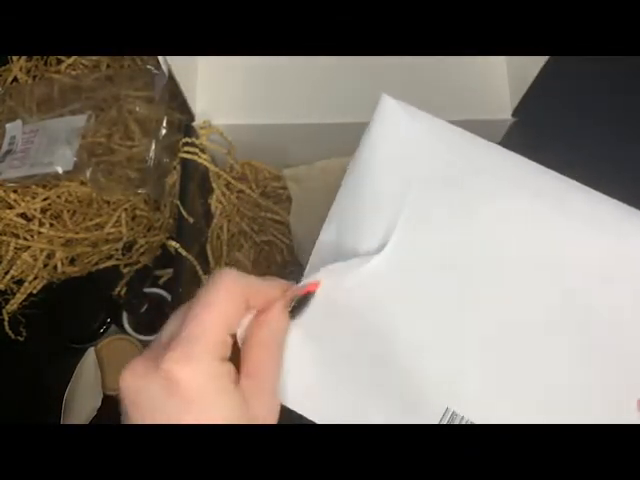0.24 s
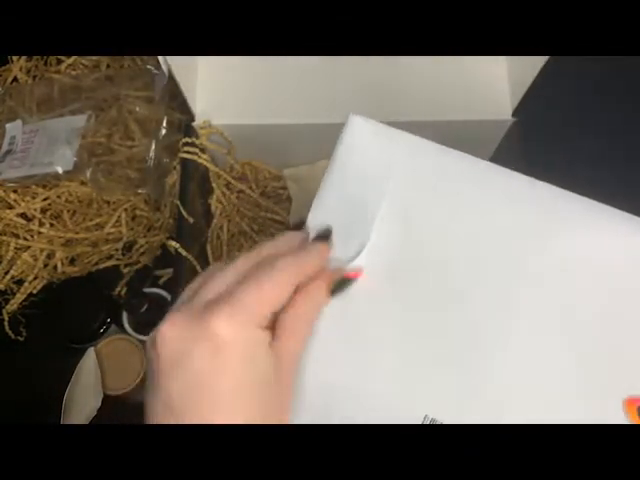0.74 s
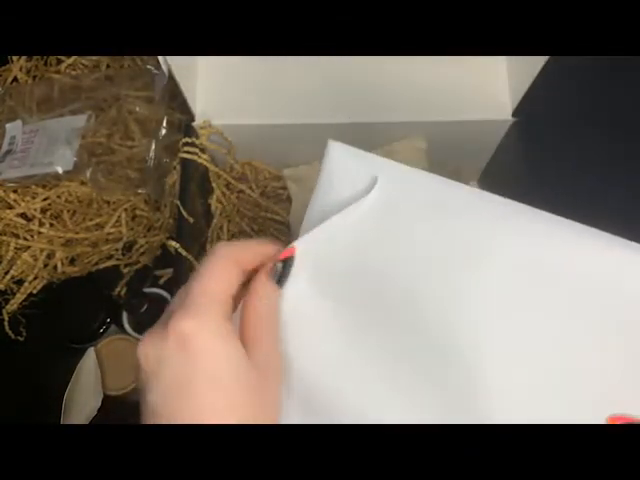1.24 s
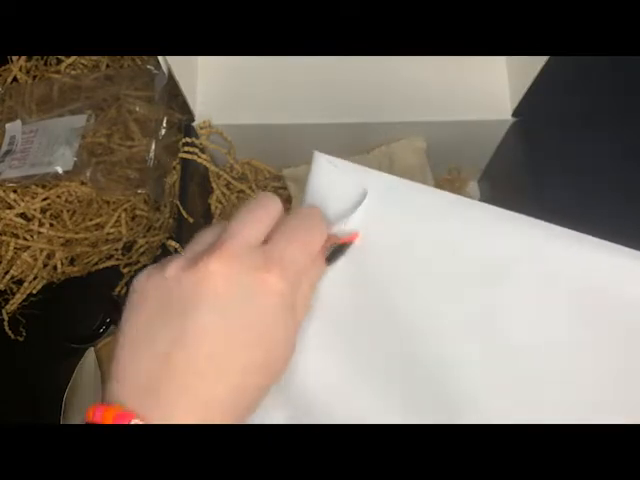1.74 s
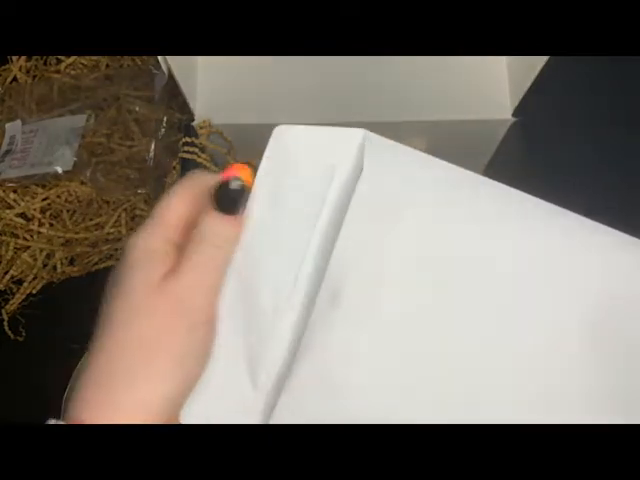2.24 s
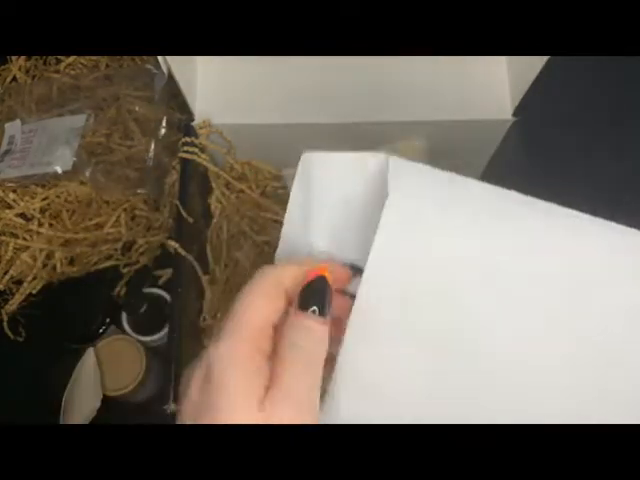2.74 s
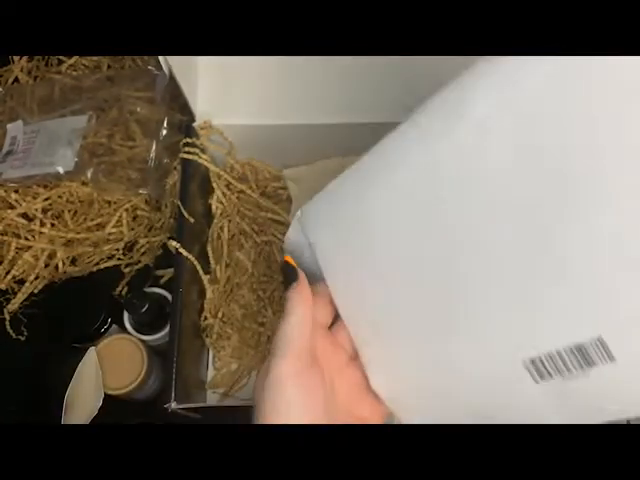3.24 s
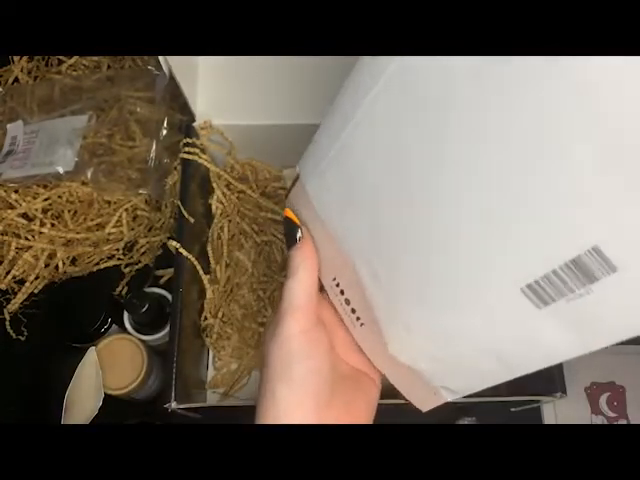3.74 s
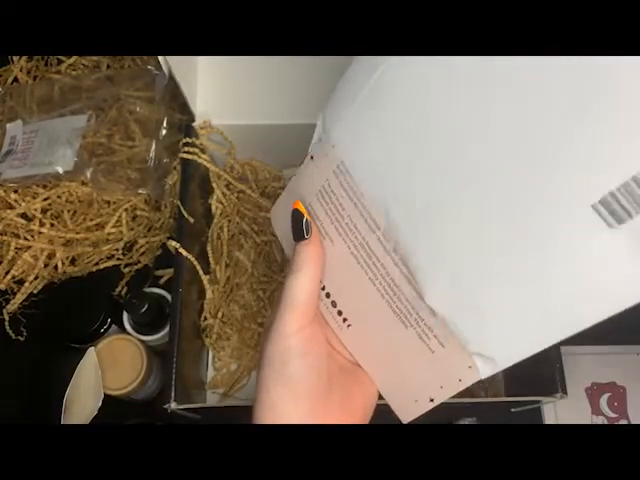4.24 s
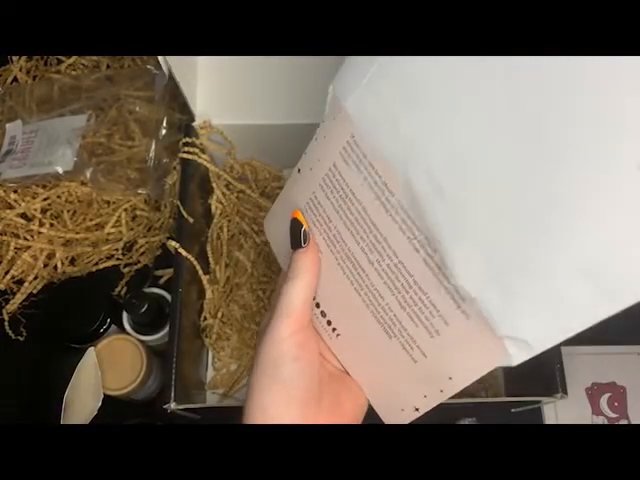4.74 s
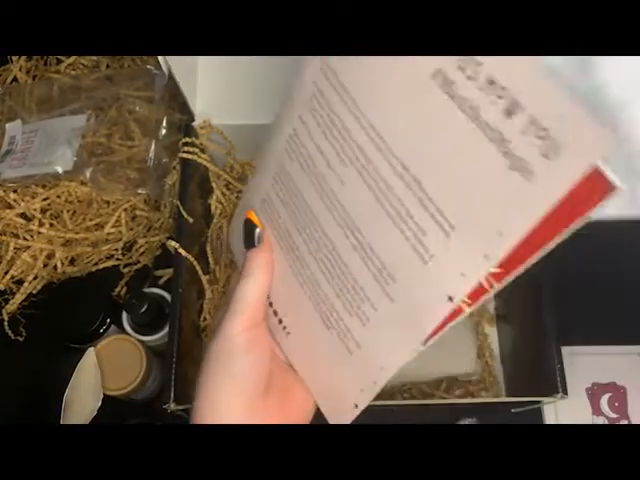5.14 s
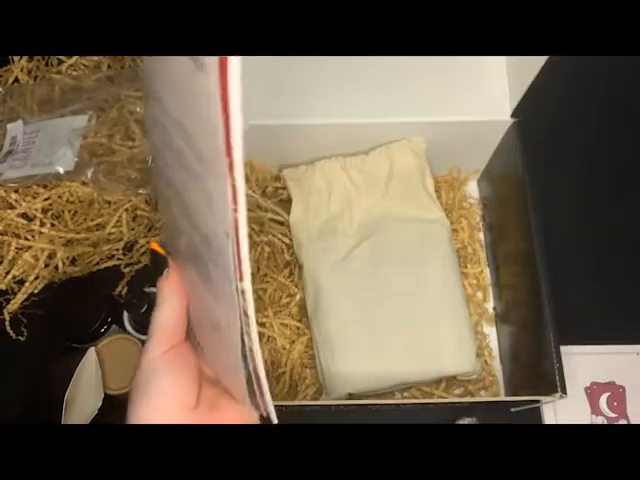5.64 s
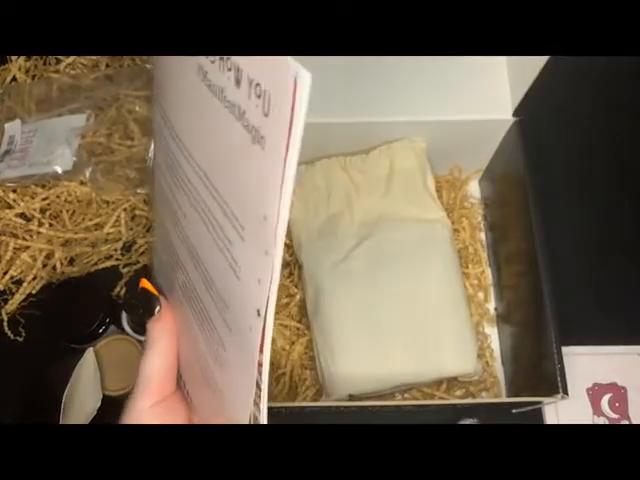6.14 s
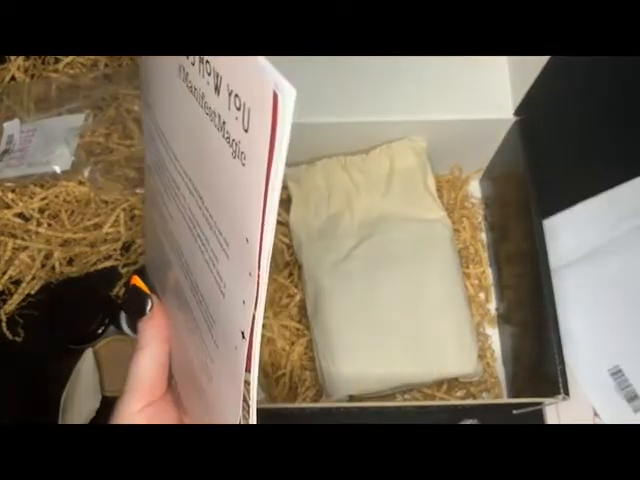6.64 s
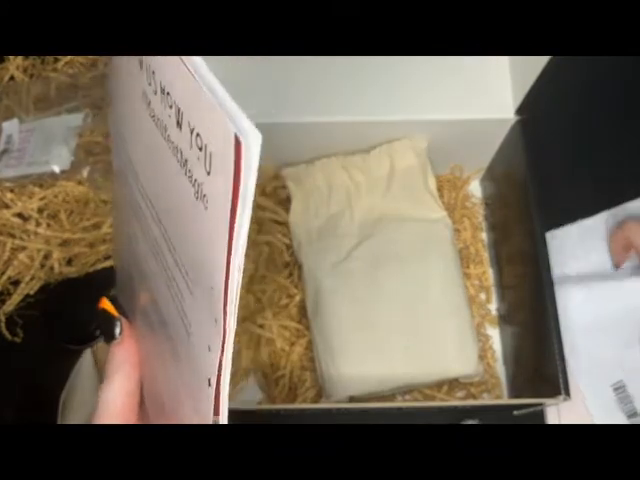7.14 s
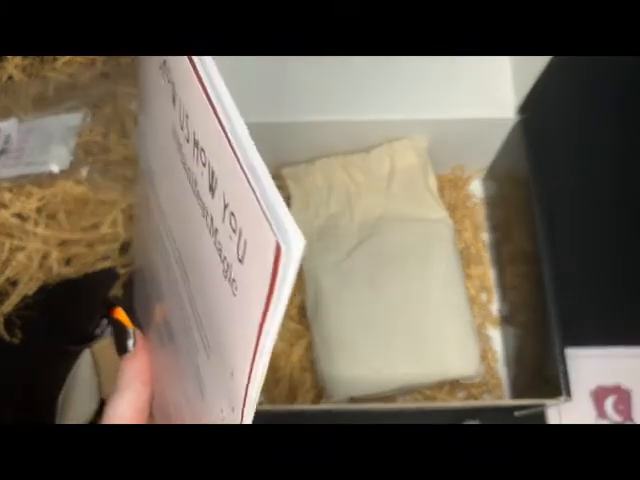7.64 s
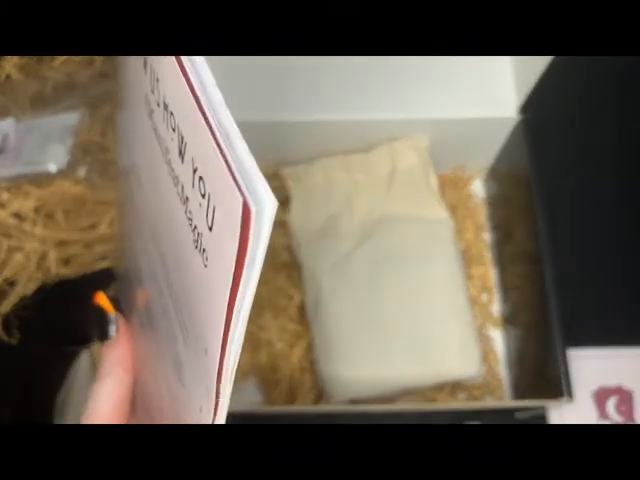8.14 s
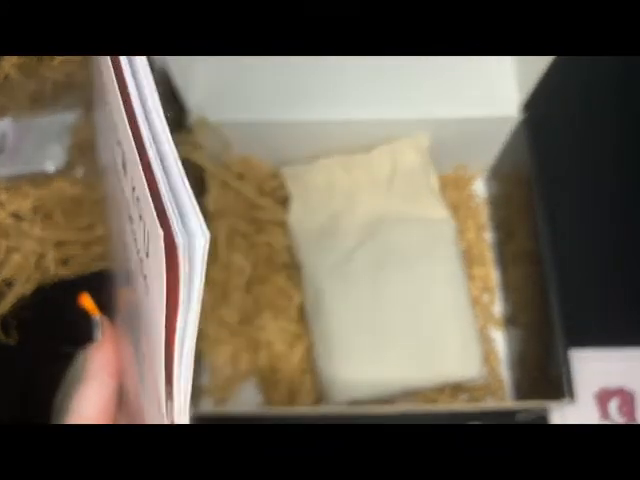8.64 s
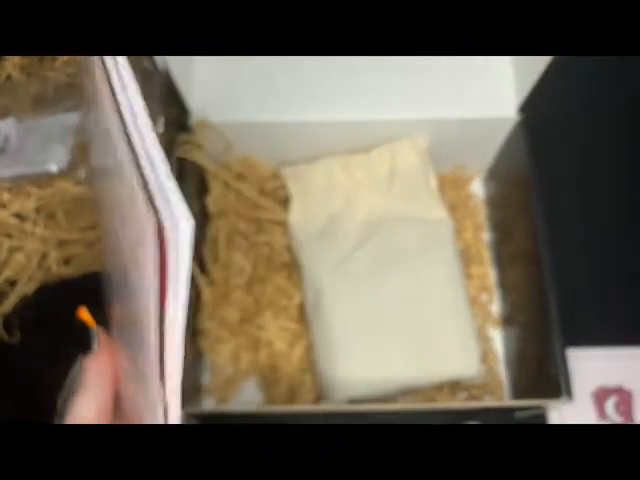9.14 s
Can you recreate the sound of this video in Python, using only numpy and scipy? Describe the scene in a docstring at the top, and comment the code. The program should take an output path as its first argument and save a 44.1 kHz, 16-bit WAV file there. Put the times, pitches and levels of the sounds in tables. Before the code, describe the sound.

Very close to a phone in a small, quiet room, fingers work at a large paper envelope. Rubbing and ticking creases start at once, with a rapid volley of snaps, then more rustling strokes. Just before two seconds a short loud rip ends abruptly with a hard crack. Softer rustles and sliding sheets follow, then sparse handling with two sharp pops over a faint low rumble.

```python
"""Paper rubs in strokes from the start while small creases tick; a volley of snaps follows, then a short rip:
fingers peel open the glued flap of a large envelope, slide sheets out and lay it down, close to a phone in a small room.
Rubbing is shaped noise, snaps are cracks ringing in paper panels and the whole sheet, the rip is swelling noise.
A low rumble and faint room tone lie beneath; the phone sends one microphone's treble to both channels, turned in phase."""
import sys
import numpy as np
from scipy import signal
from scipy.fft import rfft, irfft, next_fast_len
from scipy.io import wavfile
from scipy.ndimage import uniform_filter1d, map_coordinates

SR = 44100
rng = np.random.default_rng(int(sys.argv[2]) if len(sys.argv) > 2 else 0)


def master_out(mix):
    """Clip the mix to full scale and print it as 16-bit PCM to the path in sys.argv[1]."""
    frames = np.transpose(np.atleast_2d(mix))
    ceiling = np.clip(frames, -1, 1)
    pcm = np.round(ceiling * 32767).astype(np.int16)
    wavfile.write(sys.argv[1], SR, pcm)


N = 413658

# Where the paper is. Each row: time in seconds, lag of the left channel in ms, crackle re rasp in dB,
# top treble gain in dB, room tail re snap in dB, small panels re large in dB.
PLACE = [(0, -0.089, -5, -2, -17, 12), (.6, -0.083, -8, 2.5, -23.5, 2.5), (2.3, -.11, -4, 2.5, -17.5, 1.5),
         (2.8, -0.089, -6.5, -3, -22, 4.5), (5.2, 0, -19.5, -1.5, -13.5, 9), (5.8, 0.2, -6.5, -4.5, -11, 3),
         (7.4, 0.17, -8, -5, -13.5, 5), (8.3, .2, -6, 3, -11, 5), (9.38, 0.22, -6, 0, -14, 8)]
# Spectrum of rubbing and breaking fibres. Each row: frequency in Hz, relative density in dB per Hz.
FIBRES = [(3500, -31), (5500, -5), (7000, -1.5), (9000, 1), (11500, -4.5), (14000, -2), (16500, -7.5)]
# Spectrum of small paper panels. Each row: frequency in Hz, relative density in dB per Hz.
SMALL_PANELS = [(1400, -23), (1800, -9), (2200, -0.5), (2900, -6), (4000, -7), (5500, -11), (8000, -23.5)]


def amp(db):
    """Gain of a level in dB."""
    return 10 ** (np.asarray(db) / 20)


def unit(x):
    """Scaled to rms 1."""
    return x / np.sqrt(np.mean(x ** 2) + 1e-20)


def curves(rows):
    """One value per sample for each column after the time."""
    time_s, *columns = np.transpose(rows)
    return [np.interp(np.arange(N) / SR, time_s, c) for c in columns]


def wobble(rate_hz):
    """A smooth random curve, rate_hz knots a second."""
    knots = rng.standard_normal(int(N * rate_hz / SR) + 4)
    return map_coordinates(knots, [np.arange(N) * rate_hz / SR])


def filtered(x, response):
    """x times a complex response of frequency."""
    size = next_fast_len(N + 8192)
    spectrum = rfft(x, size) * response(np.fft.rfftfreq(size, 1 / SR))
    return irfft(spectrum, size)[..., :N]


def coloured(x, spectrum):
    """x through (Hz, dB) points; white noise keeps its power."""
    f, db = np.transpose(spectrum)

    def gain(hz):
        return unit(amp(np.interp(np.log(hz + 1), np.log(f), db, -120, -120)))

    return filtered(x, gain)


def pair(alike, patchy_db):
    """White stereo noise of channel correlation alike, with patches of random gain in time and pitch."""
    z = signal.stft(rng.standard_normal((2, N)), nperseg=256)[2]
    field = rng.standard_normal(z.shape[1:])
    field = uniform_filter1d(uniform_filter1d(field, 4, 0), 8, 1)
    mid, side = signal.istft(z * amp(patchy_db * unit(field)), nperseg=256)[1][:, :N]
    turn = np.arccos(np.clip(alike, 0, 1)) / 2
    return unit(np.cos(turn) * mid + np.sin(turn) * np.array([side, -side]))


def catches(rate_hz, spread_db, t60_s):
    """Envelope of fibres that catch and let go at random moments, a few much harder than the rest."""
    when, size = rng.random(N), rng.exponential(1, N)
    kicks = (when < rate_hz / SR) * amp(spread_db * np.minimum(size, 3))
    return signal.lfilter([1], [1, -amp(-60 / (t60_s * SR))], kicks)


def strokes():
    """Gain of each rubbing layer: every stroke rises, holds and dies away; overlapping strokes add in power."""
    # Each row: time of full force in seconds, force in dB, rise in seconds, hold in seconds,
    # hiss re rasp in dB, boom re force in dB.
    stroke_rows = [(0.0, -39.5, .02, 0.024, 7, -4), (0.181, -29.5, 0.27, 0.03, -3, -10.5),
                   (0.253, -39, 0.15, 0.2, -6, -30), (0.505, -44, 0.094, 0.0018, -11, 2),
                   (0.655, -38.5, 0.033, .12, -5.5, -20), (0.888, -33.5, 0.31, 0.053, -0.5, -6),
                   (1.028, -28.5, 0.3, 0.037, 0.5, -13), (1.097, -37.5, 0.16, 0.026, 0.5, -6.5),
                   (1.259, -39.5, 0.13, 0.0023, -16.5, -6), (1.298, -40.5, 0.097, 0.018, -11.5, 3),
                   (1.506, -50.5, 0.39, .03, -6.5, -9.5), (1.609, -42.5, 0.022, .03, -0.5, -6.5),
                   (1.707, -37.5, 0.031, 0.041, 2.5, -10.5), (1.776, -54.5, 0.15, .02, 15.5, 7),
                   (1.888, -39, 0.23, 0.0014, -3.5, -6), (1.947, -17, 0.083, .0, -10.5, 4),
                   (2.028, -48, .1, 0.042, -11, 16), (2.21, -47.5, 0.11, 0.083, -2, 3),
                   (2.57, -40, 0.015, 0.01, -2, 0.5), (2.648, -42, 0.057, .0, 1, -3.5),
                   (2.763, -48, 0.17, .0, -3, 5), (2.909, -51, 0.1, 0.11, -3, -9),
                   (3.093, -48, 0.25, 0.039, -5.5, 1), (3.187, -44, 0.047, 0.0061, -7, -2),
                   (3.286, -44, 0.12, 0.18, 5.5, -16), (3.496, -39, 0.12, .0, -12.5, 11),
                   (3.576, -51.5, 0.083, 1.56, 2, -13.5), (3.693, -38.5, 0.038, .0, 1.5, -16),
                   (3.803, -36, 0.15, 0.021, 2, -4.5), (3.96, -42, 0.41, 0.065, -2.5, -0.5),
                   (4.073, -39, 0.025, 0.043, 3, -8), (4.23, -45.5, 0.077, 0.09, 0, -8),
                   (4.461, -36.5, 0.08, 0.02, 6, -17), (4.609, -45.5, 0.12, 0.021, -4, -11),
                   (4.688, -41.5, 0.029, 0.016, 3, -12), (4.774, -40.5, 0.054, 0.096, 9, -12),
                   (4.922, -43, 0.067, 0.2, 7.5, -4), (5.455, -56.5, 0.12, 0.0087, -1.5, -1),
                   (5.74, -59, 0.023, .03, 2, -2.5), (5.912, -36.5, 0.12, 0.012, -2.5, -2.5),
                   (6.003, -52, 0.093, 0.01, -5, 2.5), (6.084, -53, 0.063, 0.019, -3, -5.5),
                   (6.234, -43, 0.14, 0.052, 8, -17.5), (6.401, -43, 0.017, 0.034, -8, 4.5),
                   (6.919, -47.5, 0.094, 0.102, 5, -20), (7.066, -35, 0.065, .0, -1, -6),
                   (7.152, -47, 0.078, 0.17, -2.5, -2.5), (7.28, -44.5, 0.13, 0.048, -12.5, 5.5),
                   (7.335, -36.5, 0.0098, 0.11, 1.5, -10), (7.597, -42.5, 0.03, .0, -16, 6),
                   (8.147, -58, 0.014, 0.0084, 2.5, -2), (8.21, -39.5, 0.023, 0.023, 9.5, 3),
                   (8.293, -36.5, 0.15, 0, -12.5, 5), (8.404, -51, 0.22, 0.23, -11.5, -1),
                   (8.491, -36.5, 0.042, 0.0029, -8.5, 9), (8.753, -49.5, 0.03, .0, -18.5, 8),
                   (8.967, -54, 0.05, 0.064, -9.5, 10), (9.223, -54, 0.15, 0.032, -13, 5.5),
                   (9.327, -52.5, 0.17, 0.022, -7, 2)]
    rise_db, release_db_per_s = 38.5, 330  # climb over one rise time; release rate at 0 dB of boom
    small_per_hiss = 0.5  # hissing strokes favour the small panels, dB per dB
    slower_per_boom = 0.18  # booming strokes die away more slowly, dB of rate per dB of boom
    t = np.arange(0, N / SR + .002, .001)
    s, force_db, rise_s, hold_s, hiss_db, boom_db = np.transpose(stroke_rows)[:, :, None]
    before_db = rise_db * np.clip(s - t, 0, None) / np.maximum(rise_s, .005)
    release = release_db_per_s * amp(-slower_per_boom * boom_db)
    after_db = release * np.clip(t - s - hold_s, 0, None)
    shape_db = -before_db - after_db
    small_db = curves(PLACE)[4][(s * SR).astype(int)] + small_per_hiss * hiss_db
    rasp_db = force_db - hiss_db / 2 - 3.0
    layers_db = [rasp_db - small_db / 2, rasp_db + small_db / 2, force_db + hiss_db / 2, force_db + boom_db]
    gains = [np.linalg.norm(amp(level_db + shape_db), axis=0) for level_db in layers_db]
    return [np.interp(np.arange(N) / SR, t, gain) for gain in gains]


def crackle():
    """Small creases tick at random moments, each in one of the panels."""
    # Resonances of the panels that small creases ring in, in Hz.
    crease_hz = [1003, 1570, 2120, 2800]
    total = 0
    for hz in crease_hz:
        kicks = catches(45, spread_db=3, t60_s=0.0024) * rng.standard_normal(N)
        total = total + unit(signal.lfilter(*signal.iirpeak(hz, 5, SR), kicks))
    return unit(total)


def rubbing():
    """Paper drags on paper: noise under uneven pressure, roughened by catching fibres, in large and small panels."""
    # Spectra of large panels and of the whole sheet. Each row: frequency in Hz, relative density in dB per Hz.
    large_panels = [(500, -28.5), (750, -14.5), (1030, -2.5), (1300, -4), (1600, -2.5), (2000, -13.5),
                    (3000, -30)]
    whole_sheet = [(130, -23.5), (200, -1.5), (300, -7.5), (360, -2.5), (480, -7), (650, -13.5),
                   (900, -11.5), (1200, -35)]
    large, small, hiss, boom = strokes() * amp(0.8 * wobble(60))
    grip = unit(0.5 + 0.08 * catches(200, spread_db=2.5, t60_s=0.015))
    ticks = np.hypot(large, small) * amp(curves(PLACE)[1]) * crackle()
    large = large * amp(0.77 * wobble(55)) * coloured(grip * pair(0.34, patchy_db=4.5), large_panels)
    small = small * amp(1.7 * wobble(50)) * coloured(grip * pair(0.44, patchy_db=2.5), SMALL_PANELS)
    hiss = hiss * coloured(grip * pair(0.46, patchy_db=4.0), FIBRES)
    buckles = unit(1.5 + .6 * catches(23, spread_db=5.0, t60_s=0.63))  # the sheet buckles at random
    boom = boom * amp(1.7 * wobble(25)) * coloured(buckles * pair(0.87, patchy_db=5.0), whole_sheet)
    return large + small + hiss + boom + ticks


def room():
    """Slightly uneven low rumble, nearly the same on both sides, and a faint room tone."""
    # Rumble level, with air pushed by the moving sheets. Each row: time in seconds, level in dB.
    sway = [(0.0, -49.5), (0.9, -50), (1.2, -57), (2.2, -41.5), (2.4, -51.5), (3.15, -45.5), (5.0, -43.5),
            (6.3, -55), (6.75, -57), (7.6, -43.5), (7.94, -60), (8.3, -47.5), (9.38, -49.5)]
    # Spectra of rumble and room tone. Each row: frequency in Hz, relative density in dB per Hz.
    rumble_spectrum = [(25, -47.5), (38, -2.5), (52, 6), (80, -4.5), (124, -2), (170, -7.5), (260, -19),
                       (400, -42.5)]
    air_spectrum = [(150, -42.5), (250, -2.5), (500, -8.5), (1000, -15), (3000, -19), (6000, -23.5),
                    (16500, -24.5)]
    uneven_db = 2.2 * wobble(8) + 3 * wobble(25)
    rumble = amp(curves(sway)[0] + uneven_db) * coloured(pair(.88, patchy_db=1.83), rumble_spectrum)
    air = amp(-66.0 + 0.48 * wobble(2)) * coloured(pair(0.052, patchy_db=2.0), air_spectrum)
    return rumble + air


def sheet_ring(t, modes):
    """The envelope rings as a slack drum: decaying modes, slightly different at each blow."""
    ring = 0
    for hz, level_db, t60_s in modes:
        decay = amp(level_db + rng.normal(0, 1.5) - 60 * t / t60_s)
        ring = ring + decay * np.sin(2 * np.pi * hz * (1 + rng.normal(0, 0.01)) * t)
    return ring


def snaps():
    """Glue or a crease cracks in a panel of its own pitch, rings the whole sheet and leaves a tail in the room."""
    # Each row: start in seconds, relative level in dB, pitch in Hz, treble re level in dB, boom re level in dB.
    snap_rows = [(0.098, -14.5, 1200, -35, -19), (0.202, -11.5, 1030, -23.5, -20),
                 (0.23, -9.5, 1970, -26, -49), (0.241, -20, 2100, -36, -40), (0.257, -14.5, 2238, -30, -25),
                 (0.267, -13.5, 2170, -27, -49), (0.286, -10.5, 2100, -25, -30),
                 (0.316, -13.5, 2110, -15, -29), (0.342, -9, 2210, -17.5, -29),
                 (0.358, -12, 2170, -14, -44), (0.37, -12, 2180, -17.5, -27), (0.396, -9, 1140, -16.5, -33),
                 (0.43, -10.5, 1130, -19.5, -29), (0.615, -18.5, 2570, -53, -20),
                 (0.651, -17.5, 2330, -16, -41), (0.662, -14, 2000, -26, -17), (0.762, -14, 2170, -27, -27),
                 (0.809, -23, 1050, -15, -9), (0.875, -19, 2200, -19, -34), (0.965, -16, 1660, -20.5, -18),
                 (1.066, -23, 1710, -14.5, 2.5), (1.186, -26, 1030, -22.5, -15),
                 (1.258, -20.5, 1100, -22.5, -24), (1.289, -27, 1030, -8, -2),
                 (1.486, -29.5, 2470, -4.5, -28), (1.781, -27.5, 1000, -9.5, 3.5),
                 (1.877, -13, 1390, -26.5, -5), (1.897, -5, 3150, -18, -24), (1.955, 5.5, 1120, -15.5, 4.5),
                 (1.963, -2.5, 1010, -14, -30), (1.977, -12, 1040, -17.5, -14),
                 (2.008, -11.5, 985, -32.5, 5), (2.244, -14, 1040, -17.5, -1.5),
                 (2.574, -26.5, 2250, -22, -14), (2.587, -25, 960, -14.5, 8), (2.653, -33, 1000, 7, -18),
                 (2.714, -31.5, 970, -17, 7.5), (2.915, -33.5, 1600, -10, -36),
                 (2.952, -25.5, 1440, -21, -9), (3.077, -25.5, 1280, -25.5, -12),
                 (3.083, -21.5, 1330, -32.5, -8), (3.194, -23, 1380, -30, -7.5),
                 (3.487, -12, 1480, -36, -4.5), (3.502, -10, 875, -45, -3),
                 (3.564, -20.5, 2240, -30.5, -28), (3.937, -31, 2230, -13.5, 5),
                 (4.074, -18, 2600, -24, -39), (4.082, -15.5, 2440, -23, -35),
                 (4.293, -30.5, 2400, -10.5, 1), (4.735, -29, 1005, -23, -7), (5.15, -30.5, 1760, 1, -24),
                 (5.299, -50, 820, -23.5, 17.5), (5.789, -40.5, 1440, -27, -10),
                 (5.91, -25, 1120, -10.5, -23), (6.408, -15.5, 1200, -19, -21),
                 (7.06, -23.5, 3730, -8.5, -8.5), (7.22, -15.5, 1804, -20.5, -23),
                 (7.24, -19, 1260, -15, -13), (7.275, -22, 1450, -25.5, -25),
                 (7.326, -10.5, 1180, -29.5, -9), (7.349, 5.5, 1634, -13, -24),
                 (7.355, -3.5, 1500, -16.5, -28), (7.391, -14, 1390, -5.5, -21),
                 (7.475, -25.5, 1180, -4.5, -4), (7.592, -20.5, 1150, -12, -8),
                 (8.198, -31.5, 1650, -12, -14), (8.495, -0.5, 1370, -30, -8.5),
                 (8.749, -20, 1370, -41.5, -24), (8.966, -28, 1510, -27, -12.5),
                 (9.208, -34, 4000, -16.5, -11), (9.291, -24.5, 1440, -21.5, -12.5)]
    # Modes of the whole sheet. Each row: frequency in Hz, relative level in dB, t60 in seconds.
    sheet_modes = [(68, -19.5, 0.19), (125, -9.5, 0.078), (308, -3.5, 0.046), (367.5, -2, 0.1),
                   (443, -5, 0.054), (583, -14.5, 0.068)]
    body, treble, sheet = np.zeros((3, 2, N + SR))
    t = np.arange(SR // 4) / SR
    give = np.exp(-(t / .0026) ** 3)  # a crease gives way within a few ms
    tail_db = curves(PLACE)[3]  # farther paper has more room in it

    def by_onset(x):
        """Scaled to rms 1 over its first 1/300 s."""
        return x / np.sqrt(np.mean(x[..., :SR // 300] ** 2))

    for s, db, hz, treble_db, boom_db in snap_rows:
        start = round(s * SR)
        at = slice(start, start + len(t))
        crack = rng.standard_normal(len(t)) * give
        crack[0] = 4  # sharp kick
        tail = rng.standard_normal((2, len(t))) * amp(tail_db[start]) * (1 - np.exp(-t / 0.00074))
        blow = crack + tail * amp(-60 * t / 0.19)
        panel = signal.lfilter(*signal.iirpeak(hz, 5, SR), blow)
        neighbour_hz = hz * (1.7 if hz < 1800 else .6)
        neighbour = signal.lfilter(*signal.iirpeak(neighbour_hz, 2, SR), blow)
        body[:, at] += amp(db - 10) * (by_onset(panel) + 0.5 * by_onset(neighbour) + 0.18 * by_onset(blow))
        treble[:, at] += amp(db + treble_db + 2.5) * by_onset(crack + .5 * tail * amp(-60 * t / .14))
        sheet[:, at] += amp(db + boom_db - 7.5) * sheet_ring(t, sheet_modes)
    low = filtered(body[:, :N], lambda hz: 1 / (1 + (hz / 5500) ** 4))
    return low + coloured(treble[:, :N], FIBRES) + sheet[:, :N]


def rip():
    """The last of the glue line tears: dense breaking of fibres swells, then stops dead as the flap comes free."""
    # Each row: time in seconds, level in dB.
    tear_level = [(1.896, -69), (1.899, -27), (1.924, -17.5), (1.94, -12.5), (1.956, -11), (1.959, -69.5)]
    s, db = np.transpose(tear_level)
    level = amp(np.interp(np.arange(N) / SR, s, db, -120, -120) + 1.4 * wobble(300))
    fibres = coloured(pair(0.36, patchy_db=3.5), FIBRES)
    panels = coloured(pair(0.51, patchy_db=3.5), SMALL_PANELS)
    return level * (fibres + 0.5 * panels)


def placed(x):
    """The nearer microphone hears the paper earlier; the top treble grows brighter or duller as the paper moves."""
    lag_ms, _, top_db, *_ = curves(PLACE)
    top = filtered(x, lambda hz: 1 / (1 + (11500 / (hz + 1)) ** 12))
    x = x + (amp(top_db) - 1) * top
    n, half_lag = np.arange(N), lag_ms * SR / 2000  # in samples
    return np.array([map_coordinates(x[0], [n - half_lag]), map_coordinates(x[1], [n + half_lag])])


def scene():
    """Paper in its place, room around it."""
    return placed(rubbing() + rip() + snaps()) + room()


def record(dry):
    """The phone: treble of one microphone spread by a phase turn, soft clipping, band limits."""
    split_hz, top_hz = 5856, 15950  # crossover to the one microphone; upper band limit

    def high(hz):
        return np.clip((hz - split_hz) / 400 + .5, 0, 1)

    def turn(hz):
        return np.exp(1j * np.pi * (hz - 1000) / 5000 * np.array([[-1], [1]]))

    def band(hz):
        return np.clip((top_hz - hz) / 200, 0, 1) / (1 + (36 / (hz + 1)) ** 6)

    stereo_low = filtered(dry, lambda hz: np.sqrt(1 - high(hz)))
    shared_treble = filtered(dry[1], lambda hz: np.sqrt(high(hz)) * turn(hz))
    both = stereo_low + shared_treble
    clipped = both / (1 + np.abs(both) ** 8) ** (1 / 8)
    return filtered(clipped, band)


dry = scene()
out = record(dry)
master_out(out)
```